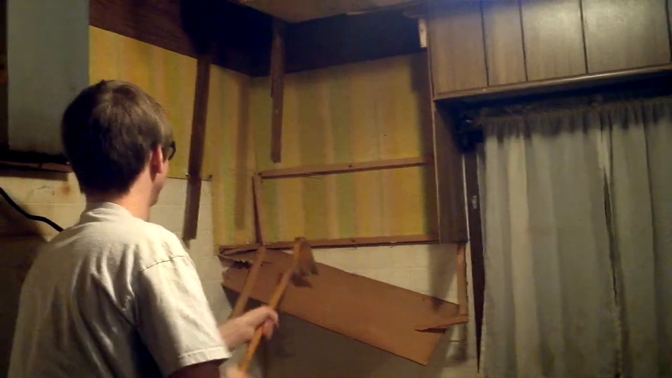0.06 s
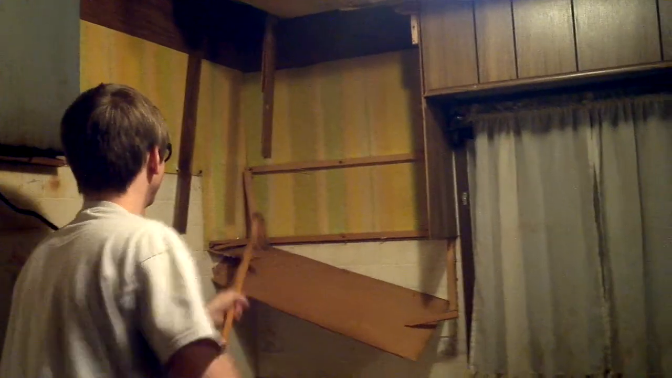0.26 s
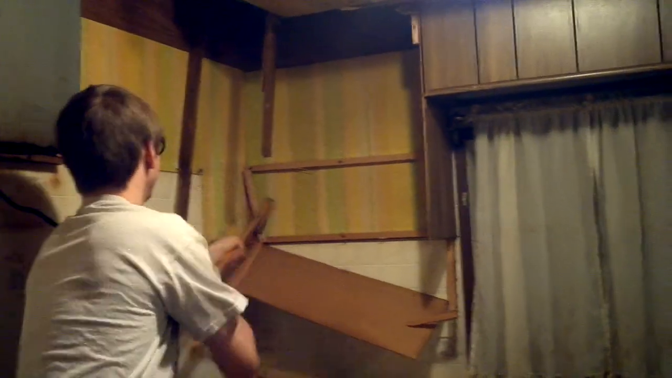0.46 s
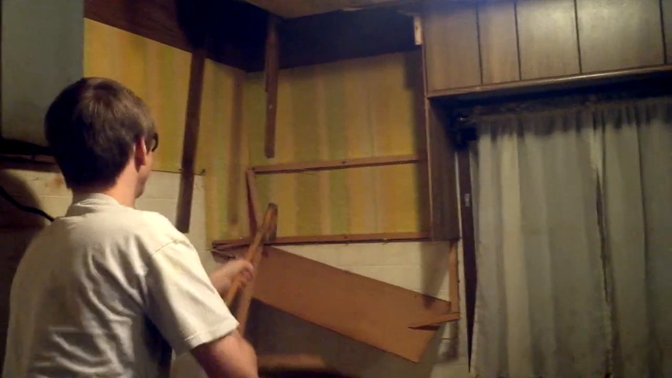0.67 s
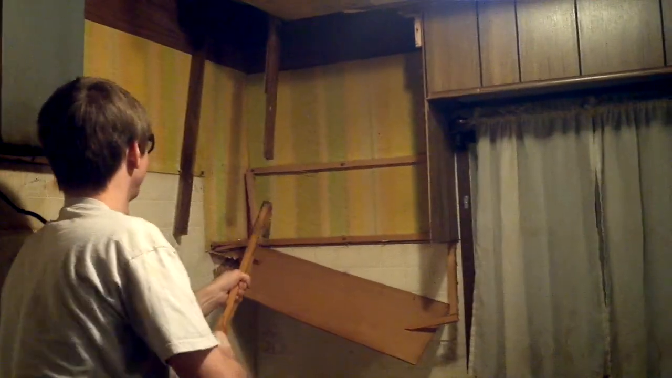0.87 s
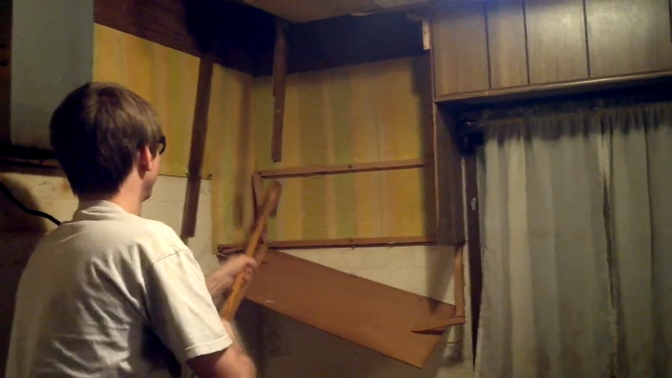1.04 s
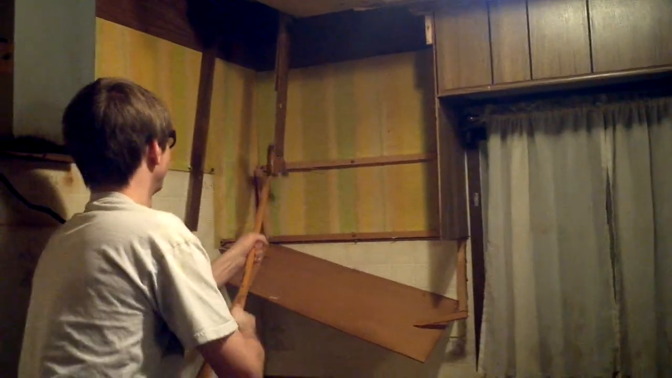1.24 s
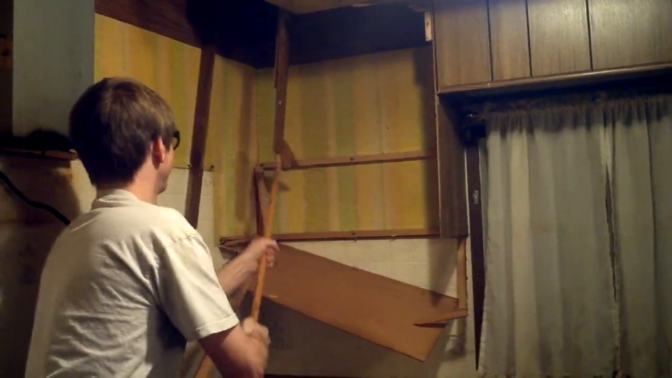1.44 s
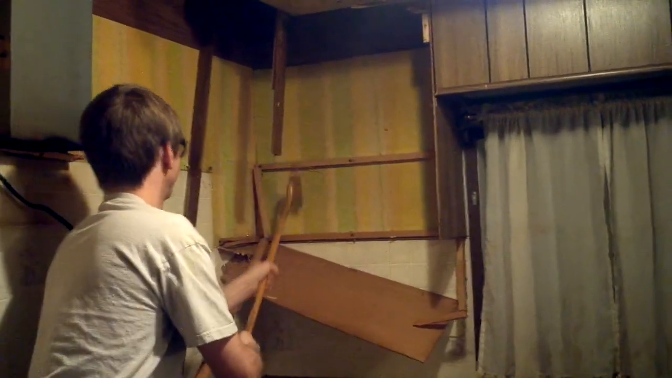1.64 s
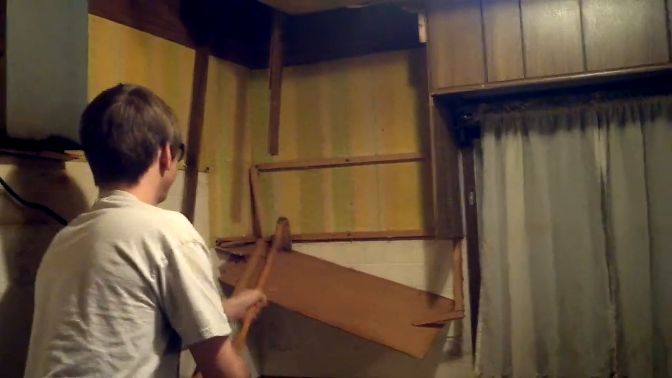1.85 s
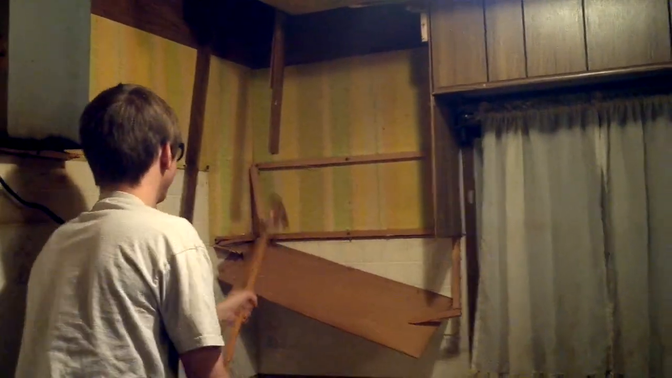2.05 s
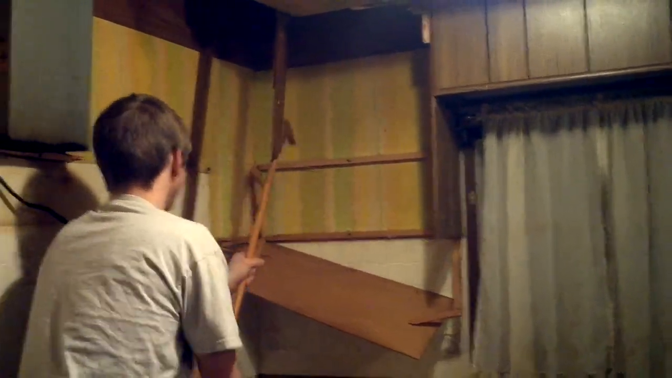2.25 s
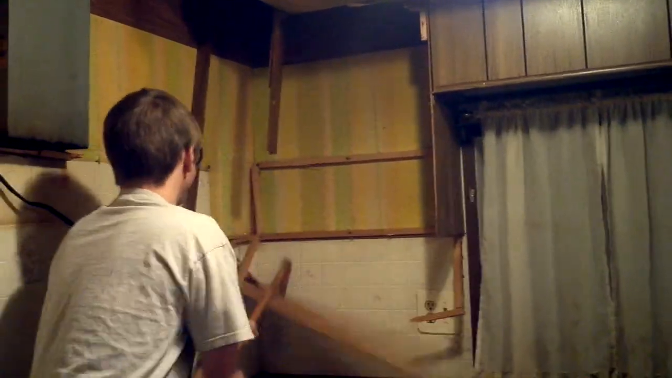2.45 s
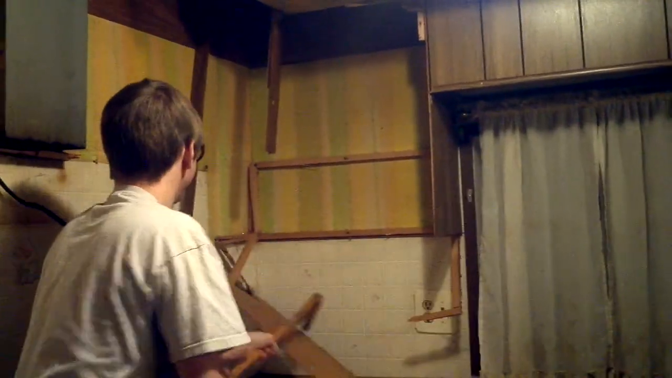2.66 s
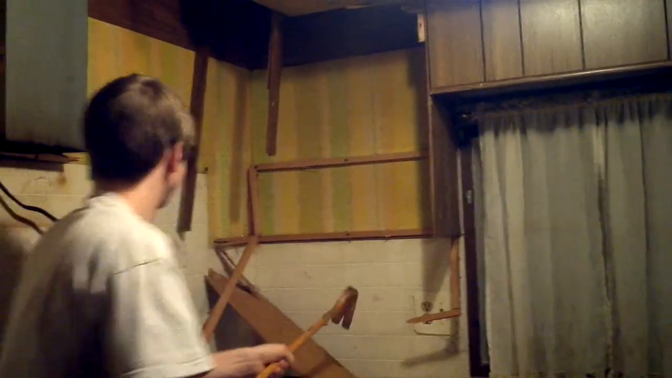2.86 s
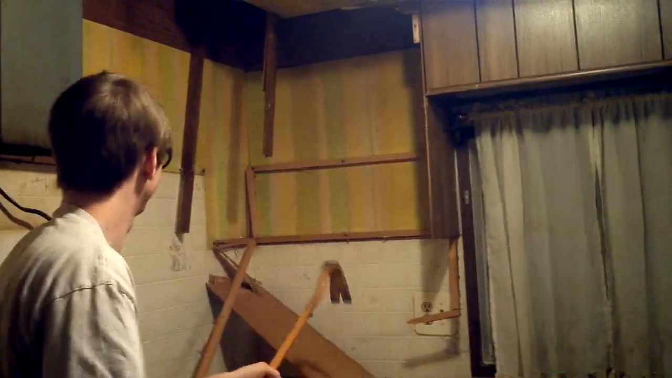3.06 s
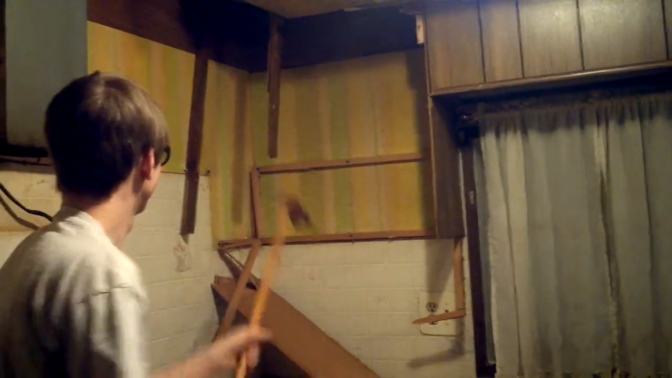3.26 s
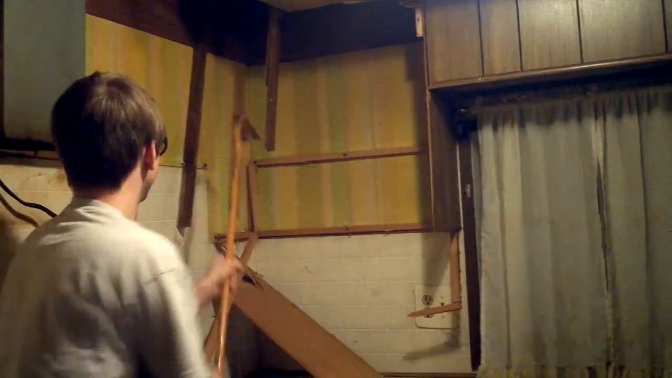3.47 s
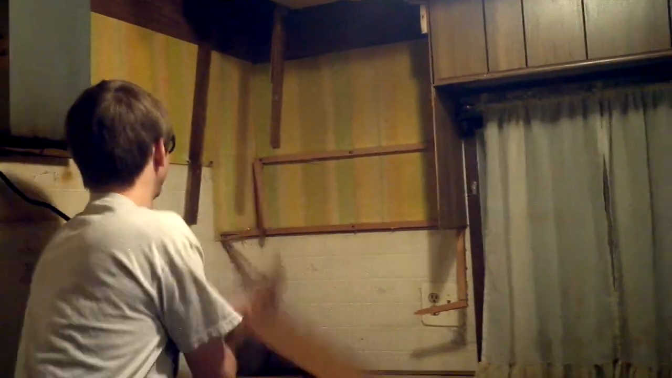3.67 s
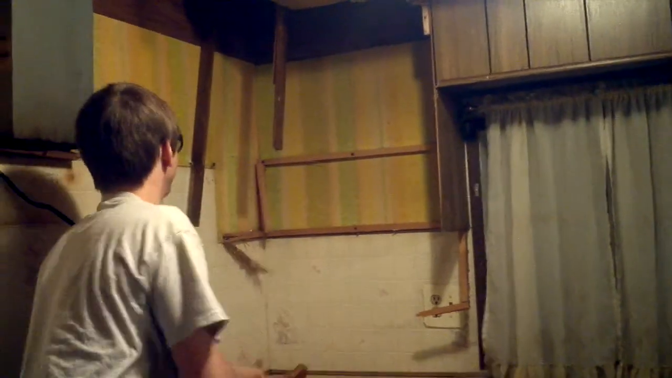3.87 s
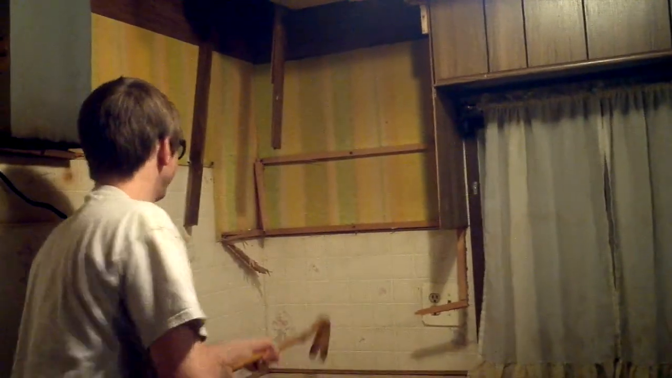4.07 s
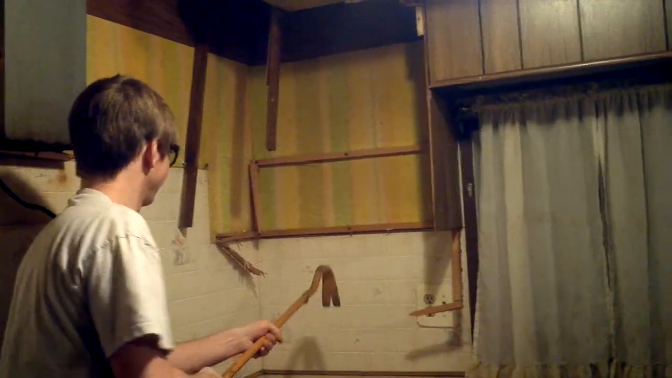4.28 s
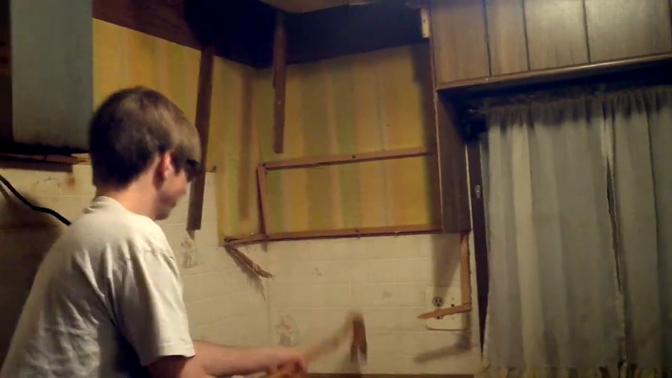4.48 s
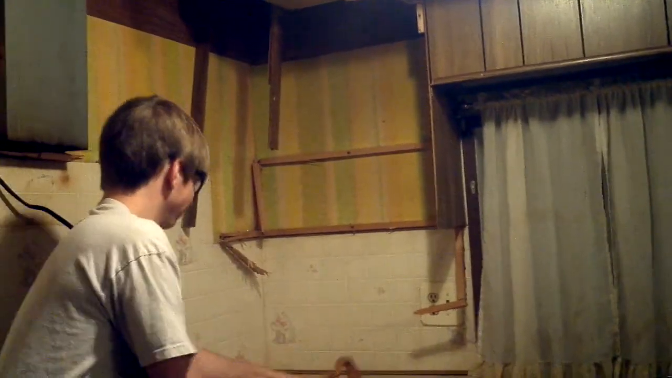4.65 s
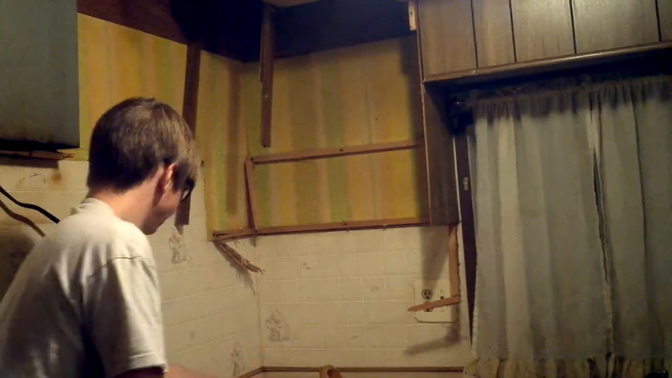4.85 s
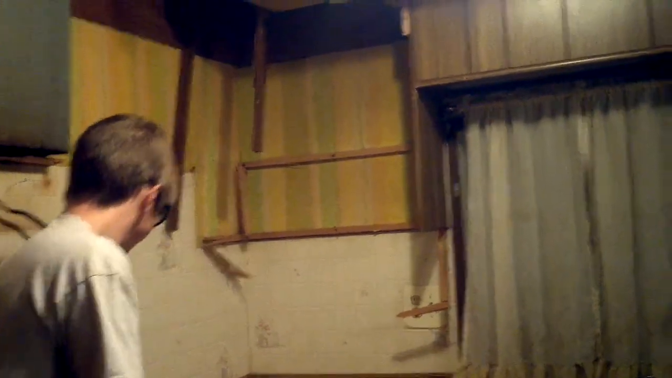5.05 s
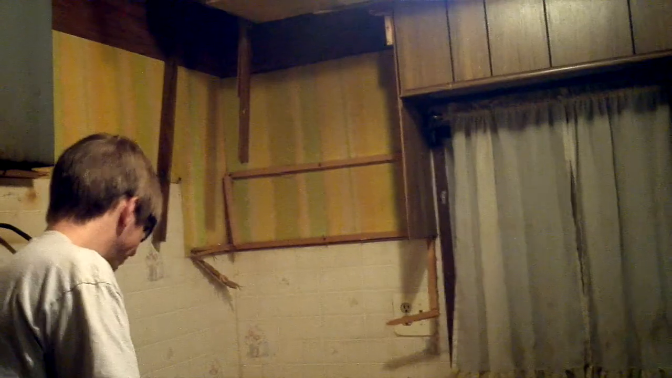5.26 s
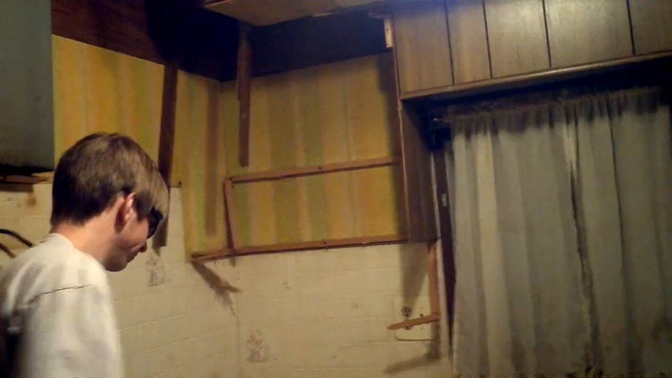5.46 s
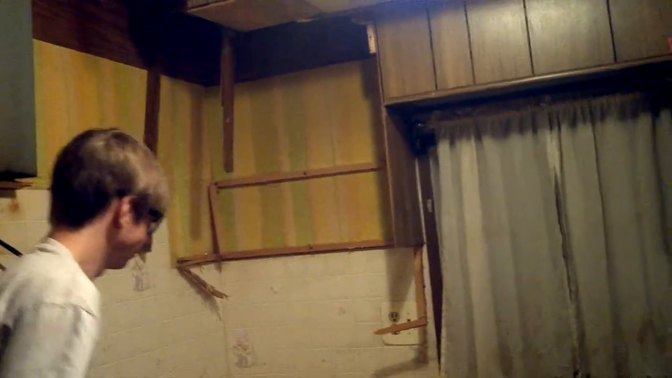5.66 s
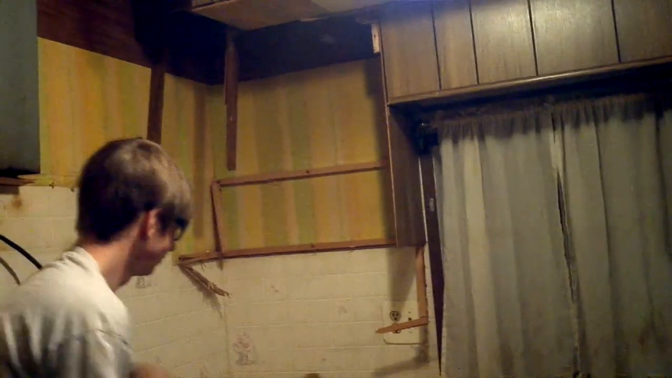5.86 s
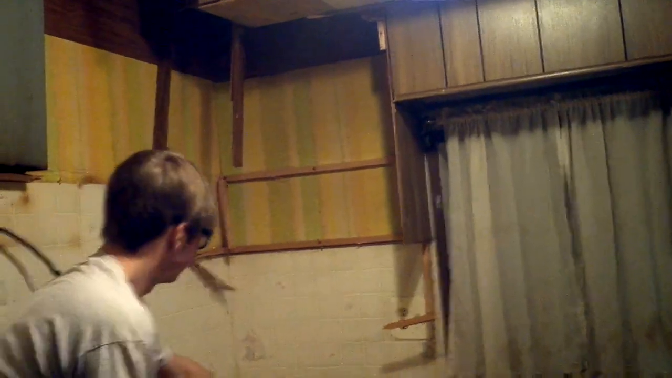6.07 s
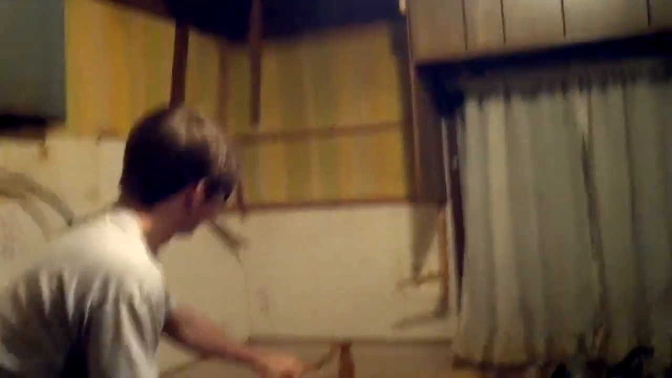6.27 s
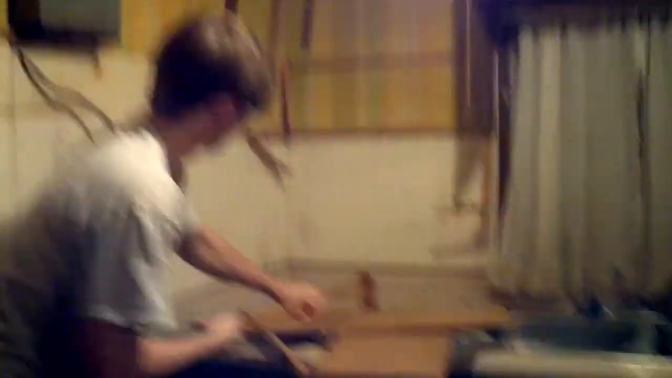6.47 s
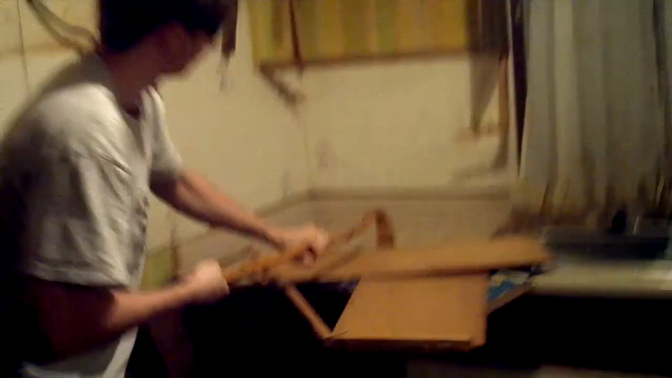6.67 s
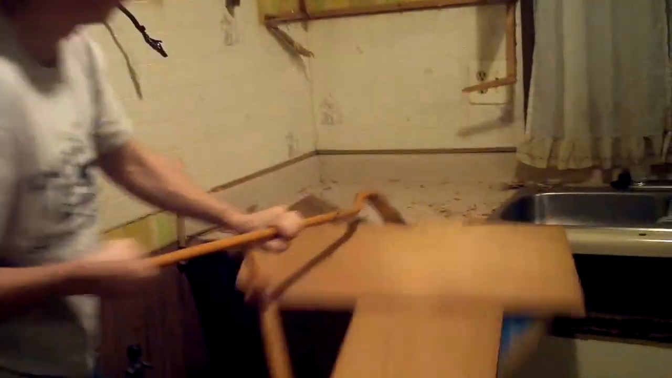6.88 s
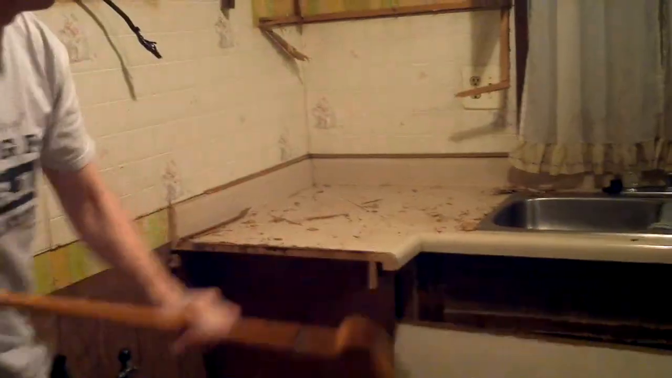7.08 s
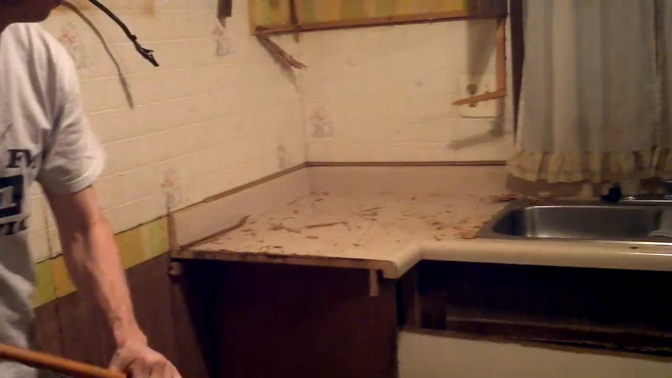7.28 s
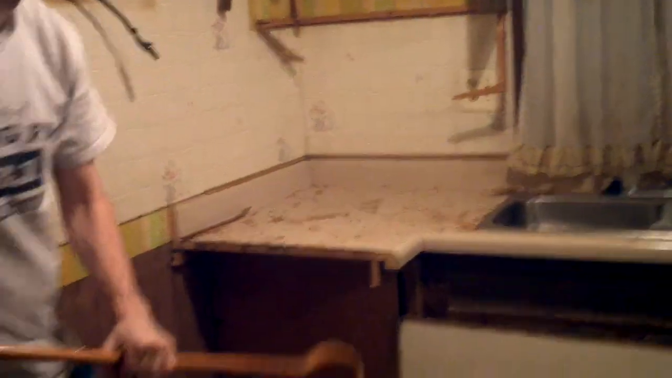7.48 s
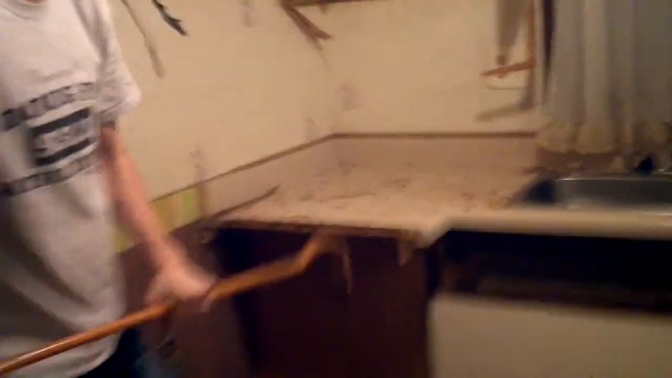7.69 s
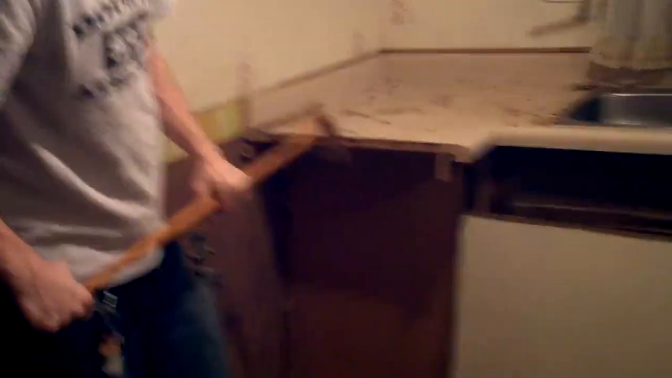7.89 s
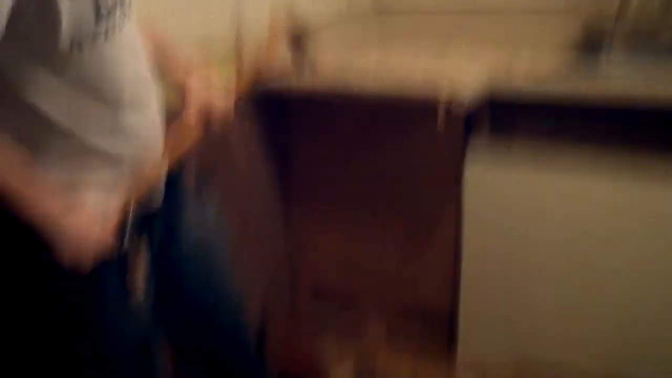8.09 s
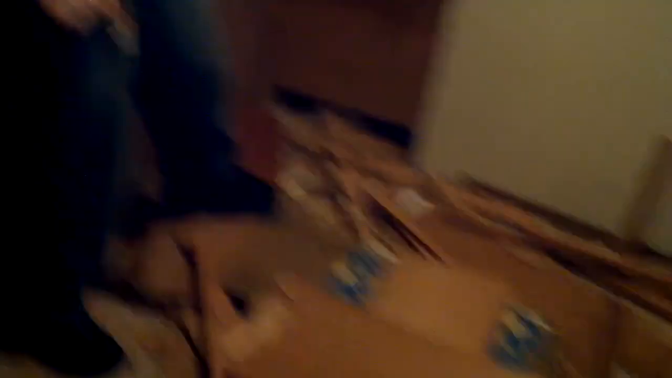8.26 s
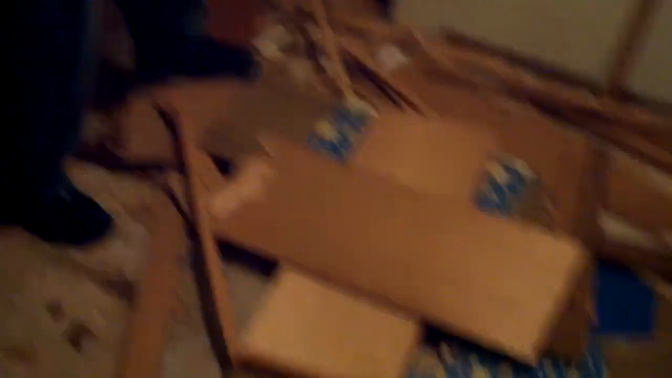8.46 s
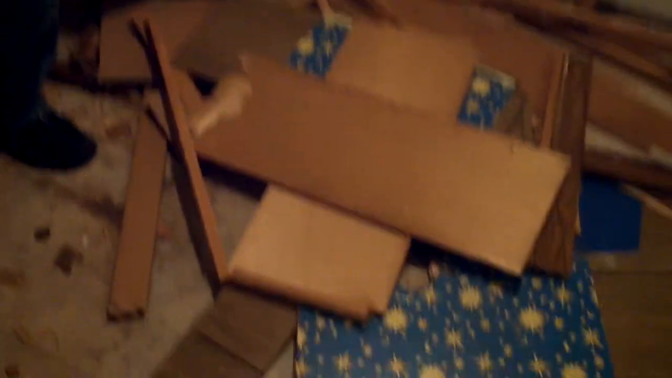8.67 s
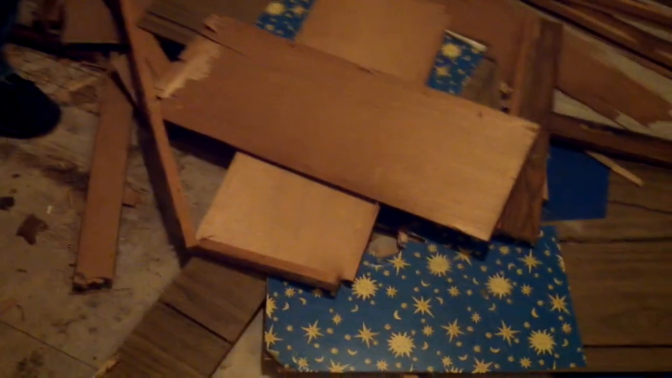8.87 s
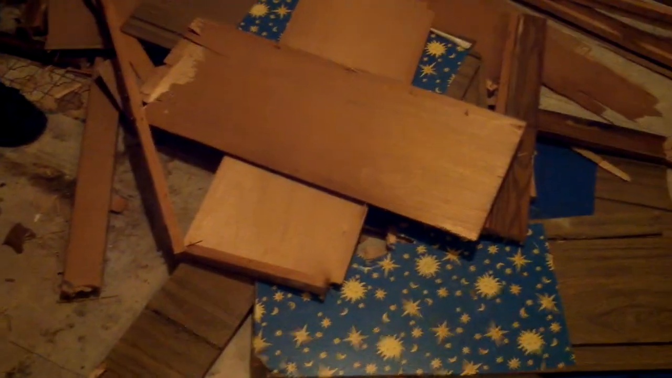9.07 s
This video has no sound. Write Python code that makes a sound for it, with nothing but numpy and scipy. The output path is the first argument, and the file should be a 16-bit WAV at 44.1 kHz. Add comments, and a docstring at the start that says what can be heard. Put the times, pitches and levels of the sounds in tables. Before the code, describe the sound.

Hard blows crack fixed wood, ringing hollow panels briefly against the wall. A big break around the middle sends boards and debris rattling down. After lighter knocks, loose boards are pushed, rubbing and squeaking, until they fall in a heavy bright clatter. The hand-held microphone is close, the room bare and short-ringing, the background faint hiss, with dry camera clicks near the end.

```python
"""Cabinet demolition in a bare room

Wooden kitchen cabinets are smashed with a long wrecking bar in a small bare room, over a faint steady hiss.
Each blow pushes ringing panels and sets off a burst of snapping fibres; boards clap down and chips tick.
Showers of debris, gritty slides, stick-slip squeaks and humming panel bumps fill the gaps.
A hand-held stereo camera close by adds its own dry clicks and widens the stereo."""
import sys
import numpy as np
from scipy import signal
from scipy.fft import rfft, irfft, next_fast_len
from scipy.io import wavfile
from scipy.ndimage import uniform_filter1d

SR = 44100
rng = np.random.default_rng(int(sys.argv[2]) if len(sys.argv) > 2 else 0)


def wrap_up_sound(samples):
    """Save the sound to the file named by the first command line argument, as 16-bit audio."""
    columns = np.atleast_2d(samples).T
    # keep every value between -1 and 1, then stretch to whole-number steps
    tamed = np.clip(columns, -1, 1)
    steps = np.round(tamed * 32767).astype(np.int16)
    wavfile.write(sys.argv[1], SR, steps)


N = 402612  # length in samples


def gain_of(db):
    """Decibels to amplitude."""
    return 10 ** (np.asarray(db) / 20)


def evened(x):
    """Scales to rms 1."""
    return x / np.sqrt(np.mean(x ** 2) + 1e-20)


def read(points, hz):
    """Reads (Hz, value) points on a log-frequency axis."""
    f, value = np.transpose(points)
    return np.interp(np.log(hz + 1), np.log(f + 1), value)


def add(mix, s, sound):
    """Mixes a stereo sound in at time s."""
    part = mix[:, max(round(s * SR), 0):][:, :sound.shape[1]]
    part += sound[:, :part.shape[1]]


def convolve(x, response):
    """Convolves mono or stereo with mono or stereo."""
    return signal.fftconvolve(np.atleast_2d(x), np.atleast_2d(response), axes=1)


def colour(*spectra, size=2048):
    """The causal minimum-phase response whose spectrum is the sum of the given dB curves."""
    hz = abs(np.fft.fftfreq(size, 1 / SR))
    log_gain = np.log(gain_of(sum(read(points, hz) for points in spectra)))
    spectrum = np.exp(np.conj(signal.hilbert(log_gain)))
    return np.fft.ifft(spectrum).real[:size // 2]


def tinted(x, spectrum):
    """A running sound given a colour, at rms 1."""
    return evened(convolve(x, colour(spectrum))[:, :N])


SOURCE_LAG = 4  # samples by which the direct sound reaches the left port later


def straight(x):
    """The direct path to the two ports, a little later at the left one."""
    left = np.pad(x, (SOURCE_LAG, 0))[:len(x)]
    return np.array([left, x])


# How long the bare room rings. Each row: frequency in Hz, t60 in seconds.
ROOM_DECAY = [(80, 0.2), (300, 0.45), (1000, 0.36), (4000, 0.32), (9000, 0.28), (16000, 0.26)]


def room(rise=0.0045, early_db=-2, early_t60=0.045, size=20480):
    """Echoes of energy 1 per port: scatter from the near corner builds up, then the bare room dies away."""
    present = rng.random((2, size)) < 7000 / SR  # about 7000 echoes a second
    taps = rng.choice([-1., 1.], (2, size)) * present
    hz, t, bands = signal.stft(taps, SR, nperseg=256)
    late = gain_of(-60 * t / read(ROOM_DECAY, hz)[:, None])
    early = gain_of(early_db - 60 * t / early_t60)
    tail = signal.istft(bands * np.hypot(late, early), SR, nperseg=256)[1][:, :size]
    tail = tail * (1 - np.exp(-np.arange(size) / SR / max(rise, 1e-4)))
    return tail / np.linalg.norm(tail, axis=1, keepdims=True)


# What the panels ring with. Each row: frequency in Hz, peak in dB relative to the push, t60 in seconds.
PANEL_MODES = [(120.3, 8, 0.12), (155, 5.5, 0.098), (243.3, 1, 0.14), (350, -3, 0.45), (462, 4.5, 1),
               (523, -3.5, 0.18), (720, -16.5, 0.37), (1241, -6.5, 0.032), (1440, -2.5, 0.2),
               (1596, -7.5, 0.089), (2020, -20.5, 0.36)]


def panel_ring(size=9000):
    """A push on a panel: the push itself plus its dying modes."""
    t = np.arange(size) / SR
    response = signal.unit_impulse(size)
    for hz, db, t60 in PANEL_MODES:
        per_length = 2 * np.log(1000) / (t60 * SR)  # a long mode peaks no higher than a short one
        response = response + gain_of(db - 60 * t / t60) * np.cos(2 * np.pi * hz * t) * per_length
    return response


def snaps(per_s, spread_db, size):
    """A sparse train of snapping fibres or grains: many small, a few large."""
    chance, strength, sign = rng.random((3, size))
    level_db = spread_db * np.minimum(-np.log(1 - strength), 4)
    return (chance < per_s / SR) * np.sign(sign - .5) * gain_of(level_db)


def tear(seconds, size=20480):
    """Fibres give way harder and harder, then the burst dies: energy 1, little bass."""
    age = np.arange(size) / SR / max(seconds, 3e-4)
    burst = snaps(9000, 1.7, size) * (0.12 + age) * np.exp(-age)
    burst = burst + 0.11 * signal.unit_impulse(size) + 1e-18
    burst = signal.sosfilt(signal.butter(2, 700, "high", fs=SR, output="sos"), burst)
    return burst / np.linalg.norm(burst)


# Colour of the steady hiss. Each row: frequency in Hz, relative level in dB.
HISS_COLOUR = [(25, -28.5), (60, -11), (130, 1.5), (450, 4), (1000, -5), (2200, -6), (4500, -12.5),
               (9000, -11), (15500, -16.5)]


def hiss():
    """Faint coloured noise, independent at each port."""
    return gain_of(-66.5) * tinted(rng.standard_normal((2, N)), HISS_COLOUR)


# Dry clicks of the camera body in the hand.
# Each row: start in seconds, relative treble level in dB, relative low knock level in dB.
CAMERA_CLICKS = [(8.2086, -47, -55), (8.3539, -35, -54.5), (8.5174, -18, -27), (8.5279, -25, -31.5),
                 (8.552, -27.5, -77)]
# Colour of a camera click. Each row: frequency in Hz, relative level in dB.
CLICK_COLOUR = [(50, -41.5), (250, 1.5), (700, 1.5), (2000, 0.5), (5000, -9), (8500, -3.5), (12000, -25),
                (16000, -27.5)]


def camera_clicks(wet_db=-14, level_db=23.0):
    """Clicks right at the microphone: a coloured impulse with quieter, mostly early echoes."""
    out = np.zeros((2, N))
    for s, treble_db, knock_db in CAMERA_CLICKS:
        click = colour(CLICK_COLOUR, [(2000, knock_db), (4500, treble_db)])
        echoes = gain_of(wet_db) * room(early_db=27.0, early_t60=0.024)
        paths = straight(signal.unit_impulse(echoes.shape[1])) + echoes
        add(out, s, convolve(click, paths))
    return gain_of(level_db) * out


# Wood and nails squeaking as they slip. Each row: start in seconds, length in seconds, centre pitch in Hz,
# relative level in dB, unsteadiness as a share of the pitch per unit of wander.
SQUEAKS = [(2.23, .035, 4580, -48, .005), (2.985, .14, 4490, -52, .005), (4.902, .024, 4590, -34, .006),
           (4.993, .028, 3700, -38, .08), (4.997, .02, 7000, -33, .025), (6.42, .29, 4200, -41, .035)]


def squeaks(space, rasp=1.3, overtone_db=-14):
    """Fast stick-slip: a thin, rasping, unsteady tone with a weak octave."""
    out = np.zeros((2, N))
    slow, fast, catch = rng.standard_normal((3, N))
    wander = evened(uniform_filter1d(slow, size=150)) + rasp * evened(uniform_filter1d(fast, size=8))
    grip = abs(evened(uniform_filter1d(catch, size=120)))
    for s, length, hz, db, unsteady in SQUEAKS:
        span = slice(round(s * SR), round((s + length) * SR))
        phase = 2 * np.pi * np.cumsum(hz * (1 + unsteady * wander[span])) / SR
        tone = np.sin(phase) + gain_of(overtone_db) * np.sin(2 * phase)
        tone = tone * grip[span] * signal.windows.tukey(len(phase), .5)
        add(out, s, convolve(gain_of(db) * tone, space))
    return out


RUB_PEAK, GRIT_PEAK = 0.33, 0.3  # share of a stroke at which each is loudest: grit slips before the board catches
STROKE_SHARPNESS = 1.38  # above 1, a stroke starts and ends more gently


def stroke(start, length, peak):
    """A smooth swell up to its peak and back to rest, as a push gathers speed and slows."""
    times = [start, start + length * np.clip(peak, .1, .9), start + length]
    along = np.interp(np.arange(N) / SR, times, [0, 1, 0])
    return np.sin(np.pi / 2 * along) ** STROKE_SHARPNESS


# Boards pushed over the counter or shuffled on the floor; the long faint row at 7.6 s is the background
# growing a little louder.
# Each row: start in seconds, length in seconds, relative rubbing level in dB, relative grit hiss level in dB.
SLIDES = [(0.663, 0.089, -41, -46), (5.386, 0.2, -43.5, -43.5), (5.459, 0.2, -40, -50.5),
          (5.64, 0.82, -66, -63), (6.228, 0.17, -39.5, -43), (6.293, 0.71, -43, -34.5),
          (6.653, 0.37, -31, -43.5), (7.026, 0.13, -29.5, -36.5), (7.6, 1.96, -70, -79),
          (8.251, 0.23, -68, -60.5), (8.422, 0.042, -55, -57), (8.442, 0.19, -50.5, -52)]
# Colour of wood rubbing or rattling. Each row: frequency in Hz, relative level in dB.
RUB_COLOUR = [(40, -42.5), (150, -14), (300, 3), (550, 6.5), (850, 3.5), (1300, -3), (2200, -3),
              (4000, -20), (16000, -29)]
# Colour of grit and crumbs. Each row: frequency in Hz, relative level in dB.
GRIT_COLOUR = [(200, -50), (2000, -5), (4000, -0.5), (5000, -3), (6200, 0), (8500, 4.5), (11000, -5),
               (16000, -11)]


def slides(space, level_db=-3, uneven_db=2):
    """Boards catch and slip, ringing, while grit hisses under uneven pressure; one faint row lifts the background."""
    rub = tinted(convolve(snaps(260, 7.1, N), panel_ring()), RUB_COLOUR)
    grit = tinted(snaps(3000, 1.9, N), GRIT_COLOUR)
    sliding = np.zeros((1, N))
    for s, length, rub_db, grit_db in SLIDES:
        sliding += gain_of(rub_db) * stroke(s, length, RUB_PEAK) * rub
        sliding += gain_of(grit_db) * stroke(s, length, GRIT_PEAK) * grit
    drift = evened(uniform_filter1d(rng.standard_normal(N), size=700))
    pressure = gain_of(uneven_db * drift)
    return gain_of(level_db) * convolve(sliding * pressure, space)[:, :N]


SPILL_S = 0.017  # time a shower takes to get going


def shower(start, t60):
    """Pieces spill quickly, then come to rest one after another."""
    age = np.maximum(np.arange(N) / SR - start, 0)
    return np.minimum(age / SPILL_S, 1) * gain_of(-60 * np.maximum(age - SPILL_S, 0) / t60)


# Showers of loose pieces after a break or a fall.
# Each row: start in seconds, relative rattle level in dB, relative crumb level in dB, settling t60 in seconds.
DEBRIS = [(0.11, -45.5, -43, 0.38), (0.98, -50, -47.5, 0.63), (2.659, -38, -45.5, 0.59),
          (2.76, -48, -73, 0.1), (2.98, -73, -50.5, 0.77), (3.808, -22, -23.5, 0.63),
          (3.923, -25, -18, 0.078), (4.68, -30.5, -36, 0.57), (4.91, -55.5, -46.5, 1),
          (5.28, -41.5, -48, 1), (7.218, -17, -25, 0.62), (7.55, -51.5, -49.5, 0.72)]


def debris(space, level_db=-5.5):
    """Loose boards rattle against each other while crumbs trickle down."""
    rattle = tinted(convolve(snaps(430, 7.1, N), panel_ring()), RUB_COLOUR)
    crumbs = tinted(snaps(620, 1.8, N), GRIT_COLOUR)
    falling = np.zeros((1, N))
    for s, rattle_db, crumb_db, t60 in DEBRIS:
        pieces = gain_of(rattle_db) * rattle + gain_of(crumb_db) * crumbs
        falling += shower(s, t60) * pieces
    return gain_of(level_db) * convolve(falling, space)[:, :N]


# Panels bumping the wall and counter.
# Each row: start in seconds, lowest mode in Hz, level of each mode in dB, t60 in seconds.
BUMPS = [(0.681, 253, -44, 0.29), (1.803, 263.5, -33, 0.24), (2.423, 256.7, -20, 0.2),
         (3.092, 238, -42, 0.13), (4.62, 125, -32, 0.17), (5.51, 342, -42, 0.37), (6.195, 305, -29.5, 0.24),
         (6.39, 255.3, -37.5, 0.21)]


def board_bumps(space):
    """A loose panel bumps into something and hums briefly in its two lowest bending modes."""
    out, t = np.zeros((2, N)), np.arange(12000) / SR
    for s, hz, db, t60 in BUMPS:
        modes = sum(np.sin(2 * np.pi * hz * ratio * t) for ratio in (1, 1.32))
        onset = 1 - np.exp(-t / 0.0018)
        hum = modes * onset * gain_of(db - 60 * t / t60)
        add(out, s, straight(hum) + .5 * convolve(hum, space)[:, :len(t)])
    return out


# Chips and splinters landing. Each row: start in seconds, relative level in dB.
CHIPS = [(0.1533, -37.5), (0.3063, -41), (0.623, -37), (0.992, -41.5), (1.1668, -43), (1.36, -52),
         (1.681, -54), (2.0567, -45.5), (2.947, -33), (3.026, -38.5), (3.234, -51), (3.3474, -45.5),
         (3.475, -38.5), (3.573, -47), (4.057, -26), (4.2158, -41), (4.297, -36), (4.397, -43.5),
         (4.451, -34.5), (5.7538, -47), (5.8265, -49.5)]
# Colour of a landing chip. Each row: frequency in Hz, relative level in dB.
CHIP_COLOUR = [(60, -27.5), (250, 9.5), (600, 7.5), (1500, -9.5), (4000, -6.5), (8500, 0), (12000, -6.5),
               (16000, -8)]


def chips(direct_db=-1, knock_db=-13, level_db=21.5):
    """Light bits of wood tick on the counter and floor, each with a faint woody knock."""
    out, tick = np.zeros((2, N)), colour(CHIP_COLOUR, [(2000, knock_db), (4500, 0.0034)])
    for s, db in CHIPS:
        paths = gain_of(direct_db) * straight(tear(0.0018)) + room(early_db=6, early_t60=0.082)
        add(out, s, gain_of(db) * convolve(paths, tick))
    return gain_of(level_db) * out


def own_resonances(uneven_db=2.5, count=150):
    """Every splintered board has its own uneven comb of resonances: (Hz, dB)."""
    hz = np.linspace(np.sqrt(600), np.sqrt(16000), count) ** 2
    ripple = uneven_db * np.clip(rng.standard_normal(count), -2, 2)
    ripple[0] = 0  # keeps the bass below the comb even
    return np.column_stack([hz, ripple])


# Colour of struck wood. Each row: frequency in Hz, relative level in dB.
WOOD_COLOUR = [(25, -29.5), (65, -18.5), (115, -3.5), (200, -5.5), (400, -10.5), (750, -8), (1300, -15.5),
               (2400, -15), (4500, -23), (6000, -22), (8500, -20), (11000, -29), (16000, -35.5)]


def strike(ring, weight, seconds, snap_db, level_db=46.0, tear_db=-7, push_db=-8, tear_stretch=2.4, size=20480):
    """Push, first snap and longer tearing, then the room, all ring the panels, weighted by (Hz, dB)."""
    push = signal.unit_impulse(size) + 1e-18
    push = signal.sosfilt(signal.butter(2, 700, fs=SR, output="sos"), push)
    first_snap = gain_of(snap_db) * tear(.0022)
    tearing = gain_of(tear_db) * tear(tear_stretch * seconds)
    direct = gain_of(push_db) * push + first_snap + tearing
    wood = convolve(colour(WOOD_COLOUR, weight, own_resonances()), ring)
    return gain_of(level_db) * convolve(straight(direct) + room(seconds), wood)


# Loose boards land or knock together. Each row: start in seconds, relative knock level in dB,
# relative cracking level in dB, base cracking time in seconds, top treble in dB relative to the cracking.
BOARDS = [(0.0525, -35.5, -36.5, 0.0054, -9), (0.3377, -50.5, -42, 0.0064, 0),
          (0.7529, -20, -13, 0.00088, -12.5), (0.817, -26.5, -26, 0.0046, -2),
          (2.5472, -32.5, -14.5, 0.002, 3.5), (2.5707, -24, -22, 0.0064, 4),
          (3.7131, -23.5, -17.5, 0.011, 2.5), (3.8294, -20, -18.5, 0.0045, 4),
          (3.8871, -28, -28, 0.0015, 0), (3.9537, -18, -15.5, 0.0019, -14),
          (4.0576, -29.5, -41, 0.0015, 18), (4.2986, -41.5, -67, 0.0027, 13),
          (4.5265, -36.5, -25, 0.0024, -12), (4.8239, -38, -32, 0.0057, 1),
          (4.9075, -41.5, -30.5, 0.0008, 1), (5.002, -51.5, -32, 0.00085, -6),
          (5.0944, -46.5, -35.5, 0.0022, -14), (5.243, -28.5, -33.5, 0.0044, 10.5),
          (7.013, -36.5, -33.5, 0.0057, -8), (7.0786, -21, -16.5, 0.004, -13),
          (7.1192, -27.5, -18, 0.0022, -4), (7.1538, -14, -9, 0.01, -3.5),
          (7.2791, -20, -10.5, 0.0019, 1.5), (7.2929, -17, -21.5, 0.0054, -11),
          (7.3277, -19.5, -21.5, 0.0035, -7), (7.484, -34.5, -35, 0.0016, -10)]
# A loose board has little bass. Each row: frequency in Hz, level in dB relative to its knock.
BOARD_BODY = [(50, -25.5), (140, -35), (300, -6), (520, 1.5), (1000, -.5), (2200, 0)]


def boards(snap_db=-4):
    """Loose boards clap down with a sharp crack and little weight."""
    out, ring = np.zeros((2, N)), panel_ring()
    for s, knock_db, crack_db, seconds, top_db in BOARDS:
        body = [(hz, knock_db + db) for hz, db in BOARD_BODY]
        crack = [(5000, crack_db), (8000, crack_db), (13000, crack_db + top_db)]
        add(out, s, strike(ring, body + crack, seconds, snap_db))
    return out


WALL_THUD_DB = -18.5  # the low thud of a blow, relative to its panel
# The bar hits wood that is still fixed to the wall or lies on the counter; a crisp break snaps harder and brighter.
# Each row: start in seconds, relative panel level in dB, relative knock level in dB,
# relative splintering level in dB, base splintering time in seconds, crispness in dB.
BLOWS = [(0.4234, -30, -23, -21, .0042, -8.5), (0.4391, -14.5, -16, -11, 0.0013, 1),
         (0.6763, -35.5, -45, -47, .0012, -0.5), (1.7999, -17, -17.5, -26, .0025, -0.5),
         (1.8113, -22, -24, -18.5, .006, 3.5), (2.221, -31, -27.5, -37, 0.0043, -9.5),
         (2.4198, -11.5, -16.5, -11, 0.0036, 4), (3.0839, -43.5, -55, -45, 0.0054, 2),
         (3.6736, -25.5, -24, -15.5, 0.0032, -1.5), (3.684, -17, -24.5, -15, 0.0065, 4),
         (4.6168, -21, -18.5, -14.5, 0.0034, -3), (6.0884, -19, -38, -46, 0.002, 4),
         (6.1934, -22, -40.5, -60.5, .007, 2), (6.25, -26.5, -37.5, -38, 0.0043, 2),
         (6.381, -25.5, -39.5, -38, 0.0035, -1), (6.7388, -34, -27.5, -28, 0.0046, -1),
         (6.8043, -32, -28.5, -31, 0.0054, -0.5), (6.8733, -29, -27.5, -30, .005, -3)]


def blows(snap_db=-6, top_per_crisp=0.43, dull_per_crisp=.6):
    """The bar splinters a panel and shakes the wall behind it; crispness tilts the splintering to the top."""
    out, ring = np.zeros((2, N)), panel_ring()
    for s, panel_db, knock_db, splinter_db, seconds, crisp_db in BLOWS:
        thud = [(140, panel_db + WALL_THUD_DB)]
        panel = [(320, panel_db), (580, panel_db)]
        knock = [(1000, knock_db), (2200, knock_db)]
        splinters = [(4500, splinter_db - dull_per_crisp * crisp_db),
                     (8000, splinter_db),
                     (13000, splinter_db + top_per_crisp * crisp_db)]
        weight = thud + panel + knock + splinters
        add(out, s, strike(ring, weight, seconds, snap_db + crisp_db))
    return out


def scene(direct=0.21):
    """All the sounds at the two microphone ports, over a faint steady hiss."""
    echoes = room()
    space = echoes + direct * straight(signal.unit_impulse(echoes.shape[1]))
    handling = hiss() + camera_clicks()
    loose = squeaks(space) + slides(space) + debris(space)
    hits = board_bumps(space) + chips() + boards() + blows()
    return handling + loose + hits


# How unlike the two ports hear. Each row: frequency in Hz, gain of their difference in dB.
APART = [(50, -6.5), (150, -2.5), (500, -10.5), (1000, -4.5), (2000, 0.5), (16000, 0.5)]
# Stereo widening. Each row: frequency in Hz, share taken from the other port (held to 0.98 at most).
CROSSFEED = [(250, 0.062), (700, 0.57), (1300, 1), (16000, 1)]
# Port balance. Each row: frequency in Hz, gain of the left port minus that of the right in dB.
BALANCE = [(60, 4.5), (150, 0), (500, 1.5), (1000, 1), (2000, -1.5), (5000, 0.5)]
PORT_DELAY, EDGE_HZ = 15, 15850  # crossfeed delay in samples, upper band edge in Hz


def record(dry):
    """The camera subtracts from each port a delayed copy of the other; then overload and band limit."""
    size = next_fast_len(N + 4096)
    hz = np.fft.rfftfreq(size, 1 / SR)
    left, right = rfft(dry, size)
    share = np.clip(read(CROSSFEED, hz), 0, .98)
    cross = share * np.exp(-2j * np.pi * hz * PORT_DELAY / SR)
    # subtracting the other port scales the sum by 1 - cross and the difference by 1 + cross
    mid = (left + right) * (1 - cross)
    side = (left - right) * (1 + cross) * gain_of(read(APART, hz))
    lean = gain_of(read(BALANCE, hz) / 2)
    ports = np.array([(mid + side) * lean, (mid - side) / lean])
    wide = irfft(ports / np.sqrt(2 * (1 + share ** 2)), size)[:, :N]
    overloaded = np.clip(wide, -1, 1)
    edge = signal.firwin(511, EDGE_HZ, window=("kaiser", 9), fs=SR)
    return signal.oaconvolve(overloaded, edge[None], "same", axes=1)


dry = scene()
out = record(dry)
wrap_up_sound(out)
```